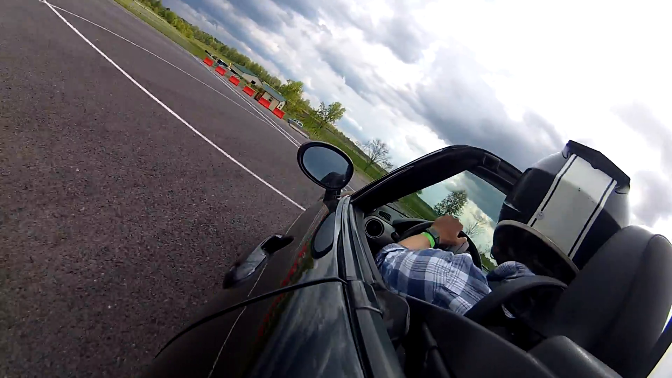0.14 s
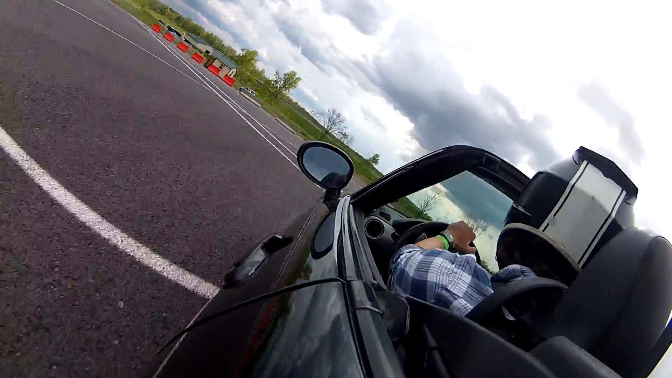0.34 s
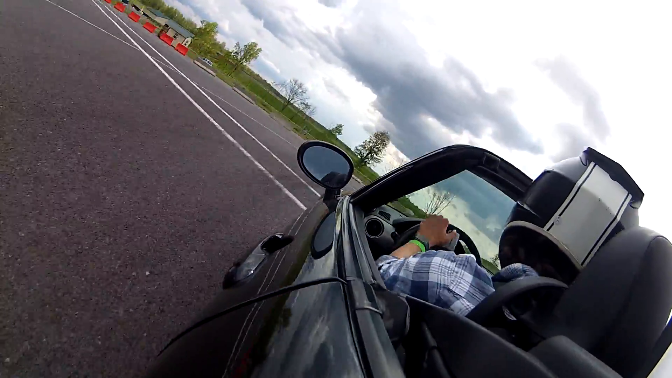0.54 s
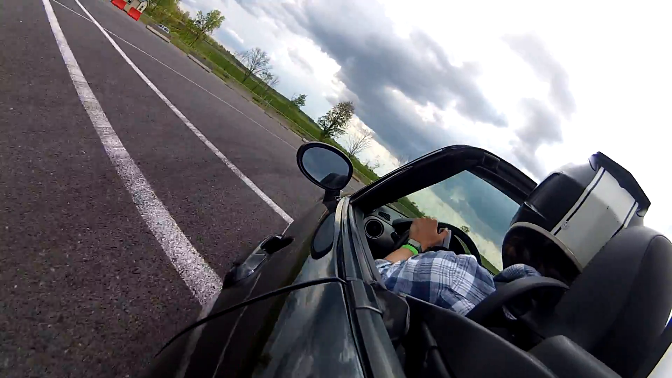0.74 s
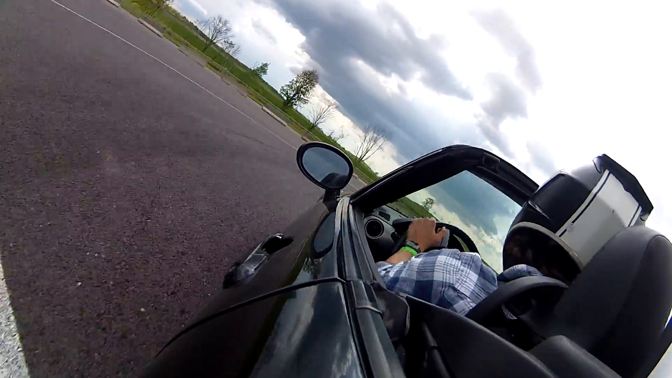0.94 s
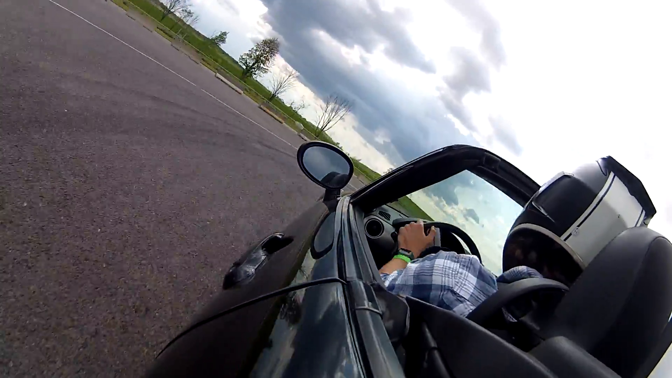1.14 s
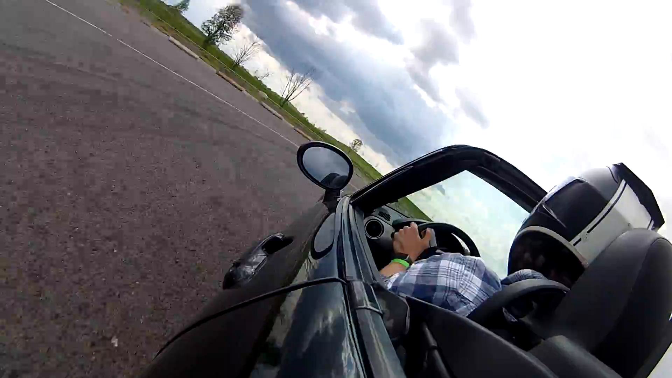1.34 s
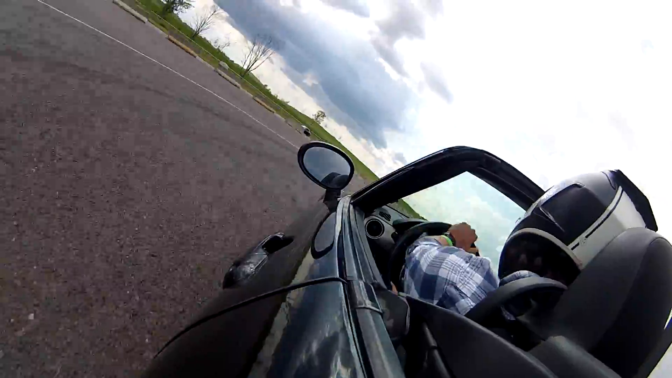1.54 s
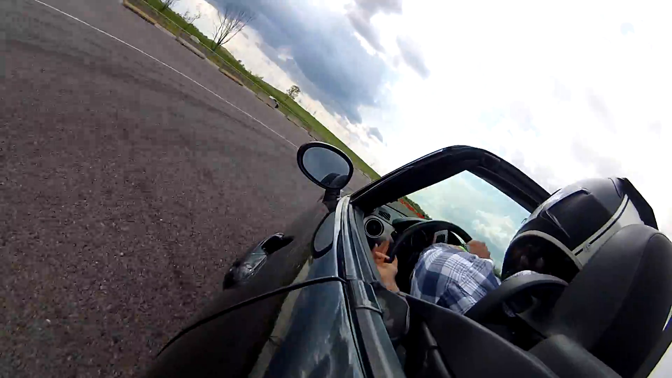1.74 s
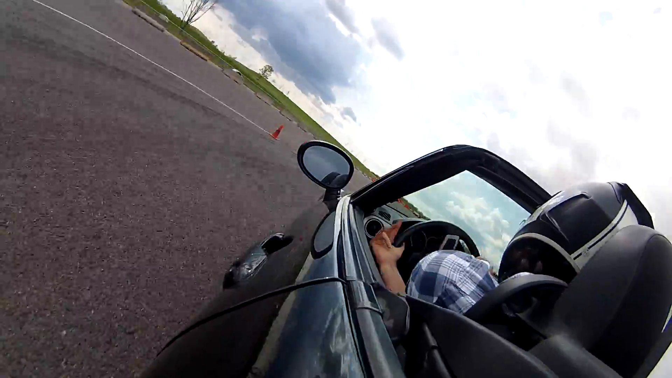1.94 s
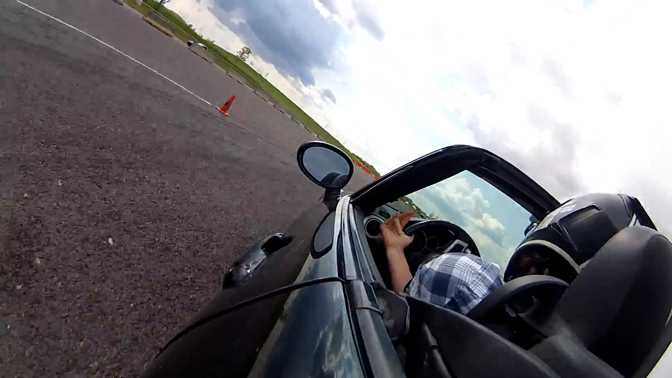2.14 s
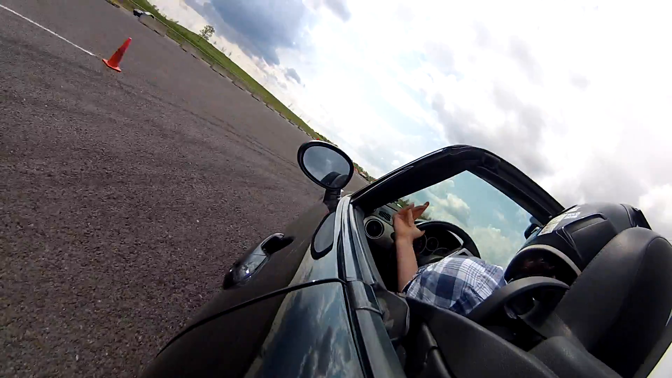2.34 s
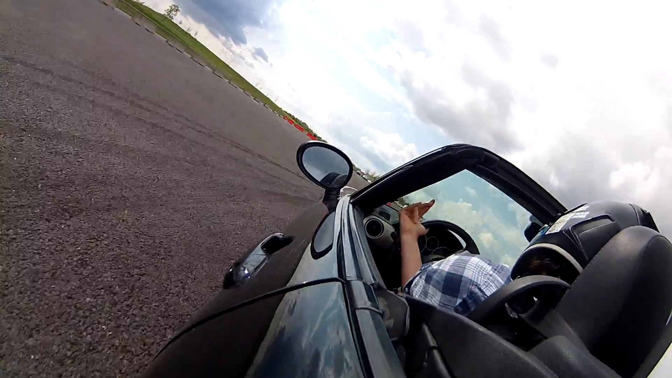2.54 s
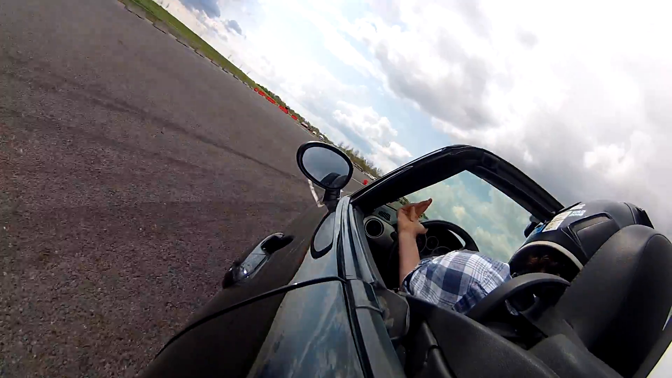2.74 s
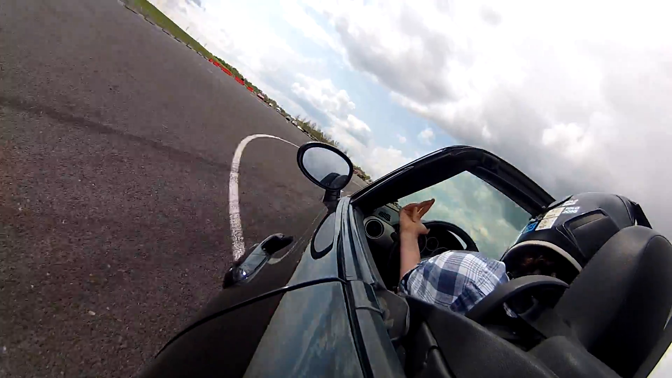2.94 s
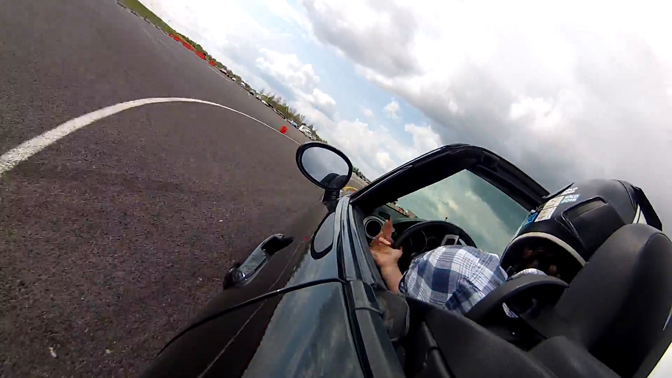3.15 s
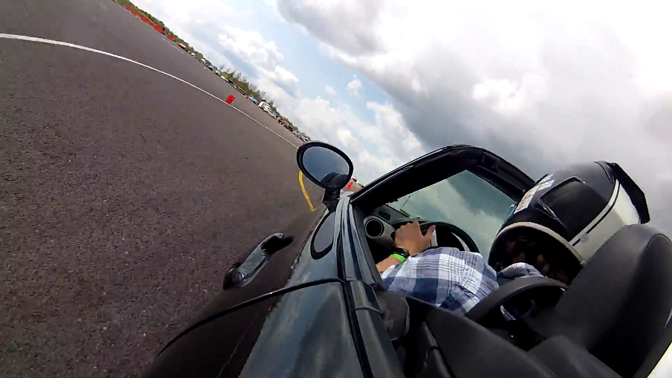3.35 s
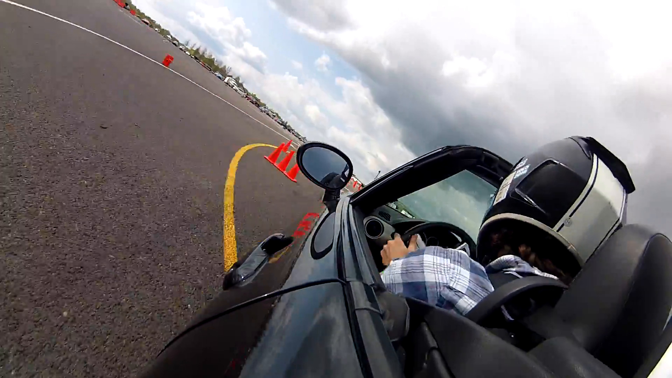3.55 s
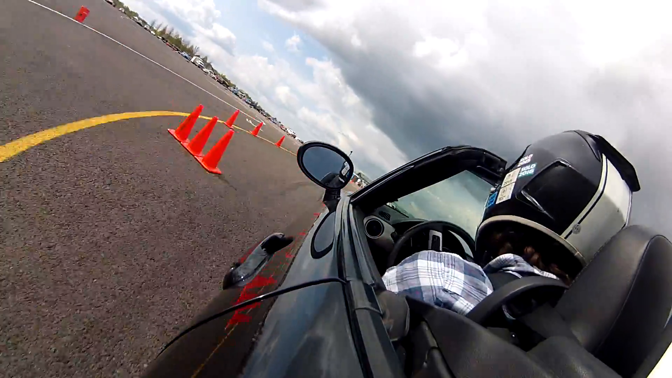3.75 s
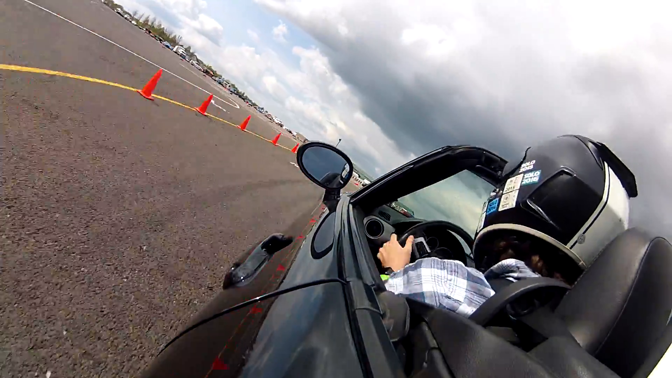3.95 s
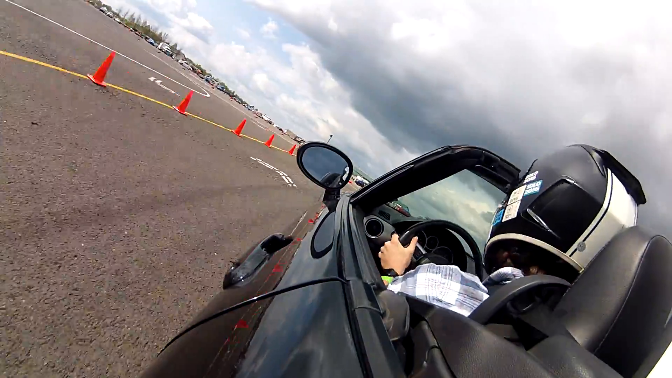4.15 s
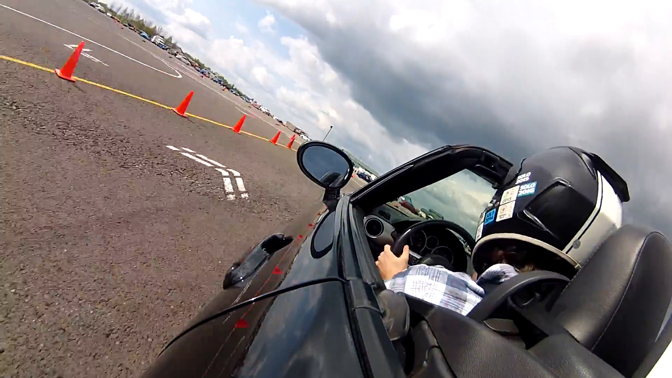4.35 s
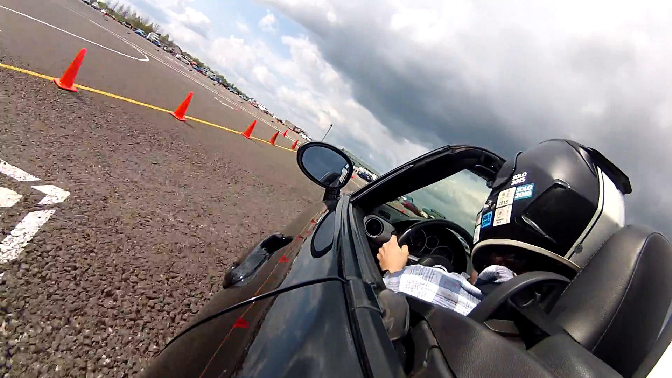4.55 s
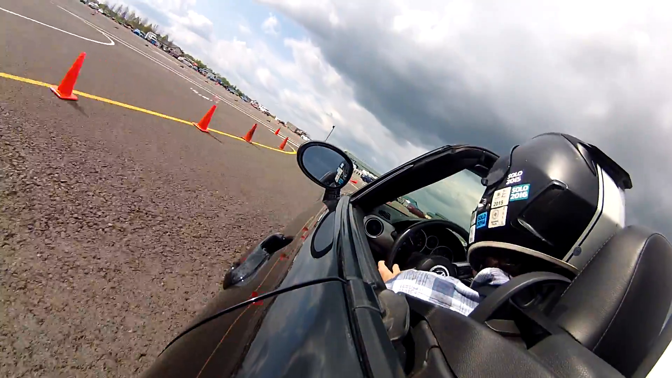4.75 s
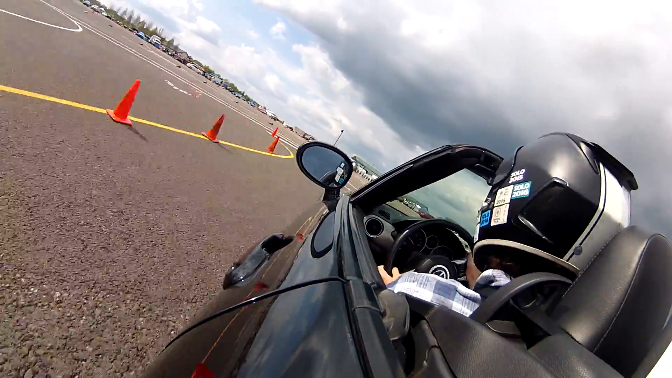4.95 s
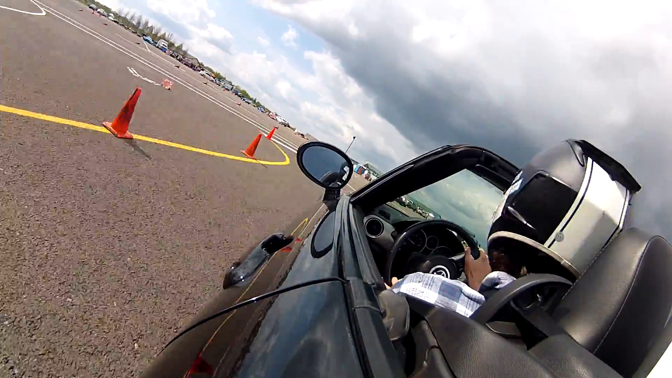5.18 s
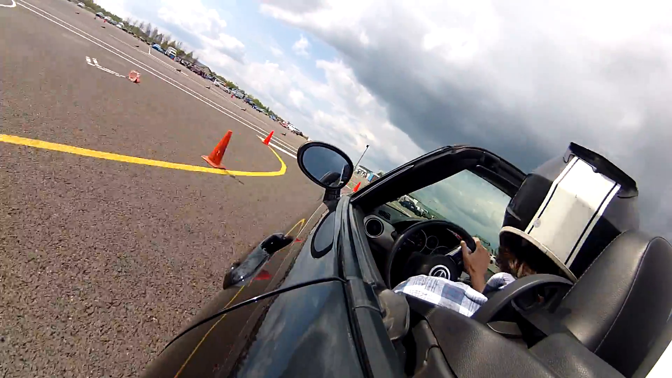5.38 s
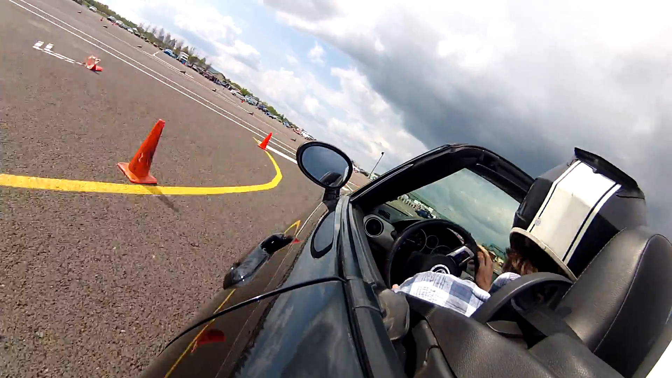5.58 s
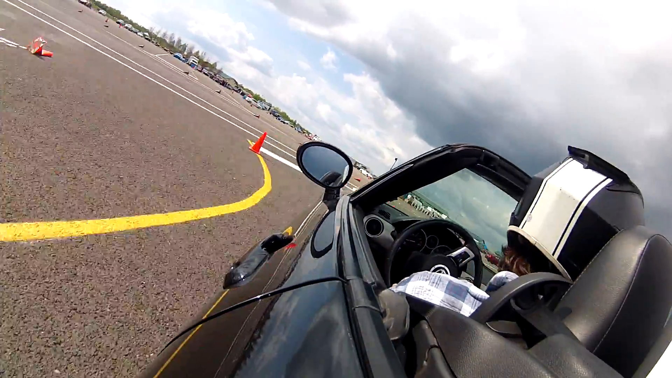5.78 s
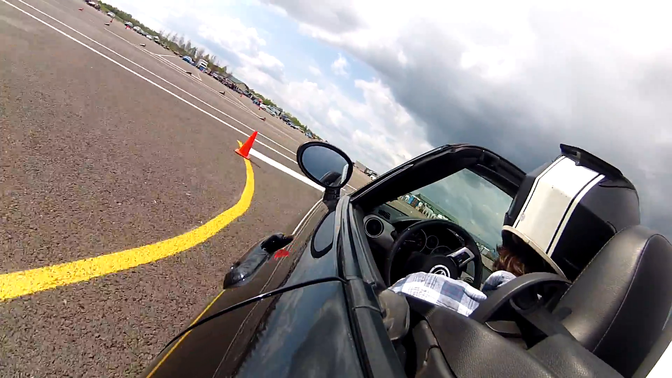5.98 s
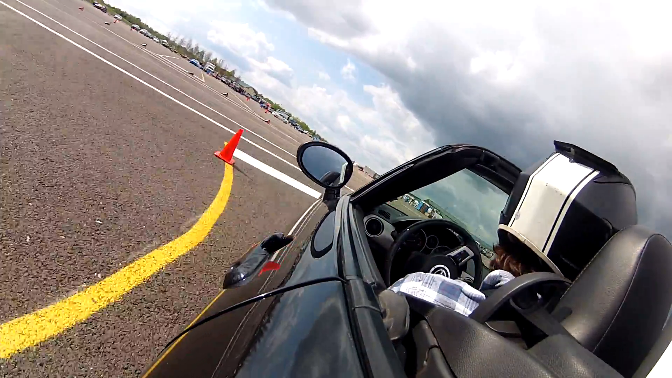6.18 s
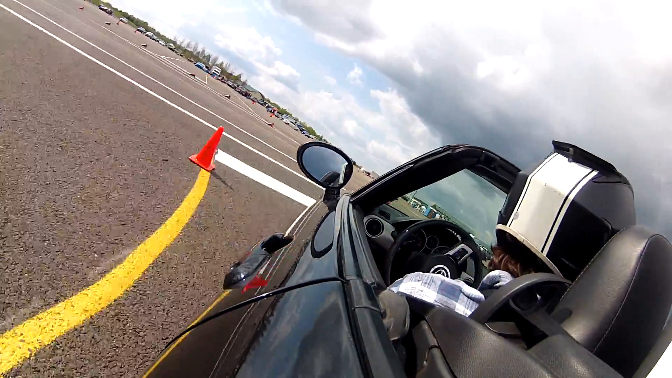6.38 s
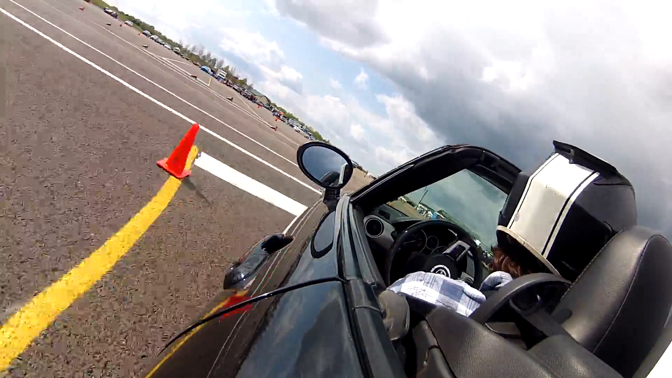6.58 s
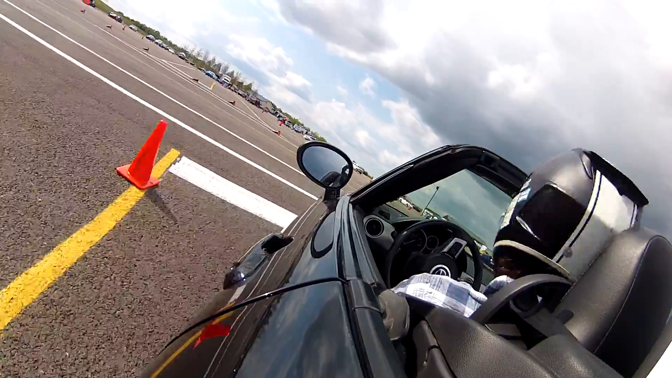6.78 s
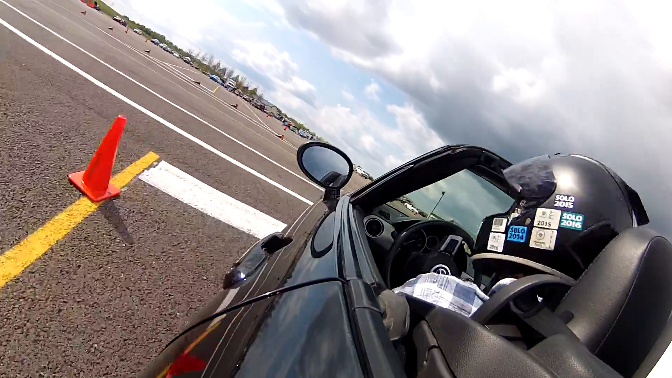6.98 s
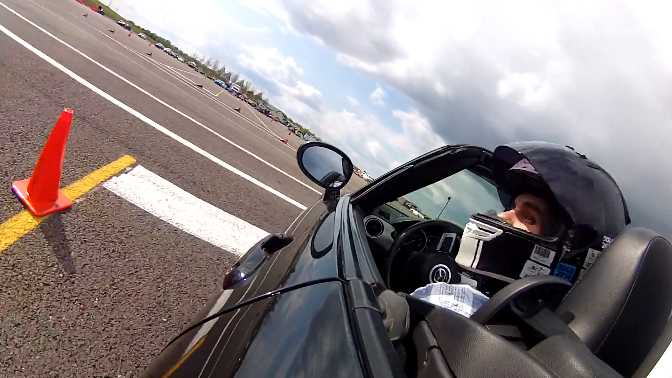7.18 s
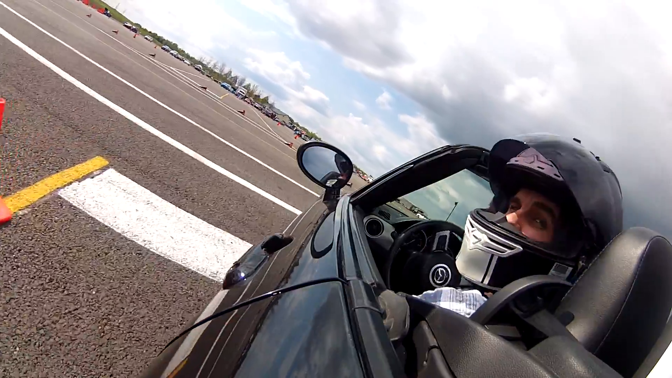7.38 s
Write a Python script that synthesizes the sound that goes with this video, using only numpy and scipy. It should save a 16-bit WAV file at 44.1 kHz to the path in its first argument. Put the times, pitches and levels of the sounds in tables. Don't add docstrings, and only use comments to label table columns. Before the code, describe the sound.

Close on a car's flank, a raspy four-cylinder surges over tyre rush and wind, crackles between stabs, then coasts, shudders and sinks to quiet puffing idle.

```python
import sys
import numpy as np
from scipy import signal
from scipy.fft import rfft, irfft, next_fast_len
from scipy.io import wavfile
from scipy.ndimage import map_coordinates

SR = 44100
rng = np.random.default_rng(int(sys.argv[2]) if len(sys.argv) > 2 else 0)


def unload_audio(sound):
    columns = np.transpose(np.atleast_2d(sound))
    steps = np.round(np.clip(columns, -1, 1) * 32767)
    wavfile.write(sys.argv[1], SR, steps.astype(np.int16))


def field_ratio(decibels):
    return 10 ** (np.asarray(decibels, dtype=float) / 20)


N = 327222
JUDDER_FROM_S, JUDDER_TO_S = 5.52, 6.28


def unit(x):
    return x / np.sqrt(np.mean(x ** 2) + 1e-20)


def along(points, hz):
    f, v = np.transpose(points)
    return np.interp(np.log(hz + 1), np.log(f + 1), v)


def curves(rows):
    s, *cols = np.transpose(rows)
    return [np.interp(np.arange(N) / SR, s, c) for c in cols]


def chance(position):
    return map_coordinates(rng.standard_normal(4000), [position], order=1)


def wobble(rate):
    return chance(np.arange(N) * rate / SR)


def window(start, stop, edge):
    t = np.arange(N) / SR
    return np.clip(np.minimum(t - start, stop - t) / edge + .5, 0, 1)


def bump(at, width):
    return np.exp(-((np.arange(N) / SR - at) / width) ** 2)


def coloured(spectrum, peaks=()):
    m = next_fast_len(N)
    hz = np.fft.rfftfreq(m, 1 / SR)
    resonance_db = sum(db * np.exp(-((hz - c) / w) ** 2) for c, w, db in peaks)
    level_db = along(spectrum, hz) + resonance_db
    return unit(irfft(rfft(rng.standard_normal(m)) * field_ratio(level_db), m)[:N])


def bursts(times, carrier, level_db, t60, rise):
    out, t = np.zeros(N + SR), np.arange(SR // 8) / SR
    for s, db, life in zip(times, level_db, t60):
        envelope = field_ratio(db + 6.0 - 60 * t / life) * (1 - np.exp(-t / rise)) ** 2
        out[round((s - rise) * SR):][:len(t)] += envelope
    return out[:N] * carrier


def ring(rows, noise_hz, rise):
    out, t = np.zeros(N + SR), np.arange(SR // 6) / SR
    for s, db, hz, t60 in rows:
        drift = np.cumsum(rng.standard_normal(len(t))) * np.sqrt(noise_hz / SR)
        envelope = field_ratio(db + 6.0 - 60 * t / t60) * (1 - np.exp(-t / rise)) ** 2
        out[round(s * SR):][:len(t)] += envelope * np.sin(2 * np.pi * hz * t + drift)
    return out[:N]


# (press [s], lift [s], release [s], rasp at press [dB], rasp at lift [dB])
PRESSES = [
    (0.163, 0.302, .85, -37, -35),
    (.37, 1.473, .21, -34, -37.5),
    (2.304, 2.567, 0.2537, -35, -35.5),
    (2.851, 3.01, .22, -34, -37),
    (3.084, 4.12, 0.2004, -35.5, -33),
]


def pedal():
    t = np.arange(N) / SR
    idle_db, in_gear_db = -94, -71
    lag_s, sag_s, sag_db = .04, 0.047, -3.4
    shut_db = idle_db + (in_gear_db - idle_db) * window(-1, JUDDER_TO_S, .2)
    opening, sag, gas_db = np.zeros(N), np.zeros(N), shut_db
    for press, lift, release, first_db, last_db in PRESSES:
        since = np.maximum(t - press, 0)
        closing = np.clip((t - lift) / release, 0, 1)
        wide = (1 - np.exp(-since / lag_s)) * np.cos(np.pi / 2 * closing) ** 2
        rush = since / sag_s * np.exp(1 - (since / sag_s) ** 2) / np.exp(.5)
        full_db = np.interp(t, [press, lift], [first_db, last_db]) + sag_db * rush
        opening, sag = np.maximum(opening, wide), sag + rush
        gas_db = np.maximum(gas_db, shut_db + (full_db - shut_db) * wide)
    return opening, sag, gas_db


# (time [s], firing rate [Hz])
REVS = [(0, 130), (.18, 126.3), (.5, 130.9), (.75, 138.8), (1.2, 155.4), (1.4, 151.6), (1.57, 168.2),
        (1.69, 150.2), (1.84, 138.8), (2.21, 127), (2.5, 128.3), (2.81, 124), (3.04, 132.7), (3.2, 124.5),
        (3.68, 137.6), (3.8, 131), (4.1, 137.9), (4.29, 135.8)]
# (time [s], firing rate [Hz], puff level [dB])
BRAKING = [
    (4.419, 139.4, -28),
    (4.63, 122.8, -26),
    (5.1, 100.8, -31.5),
    (5.62, 75.49, -32.5),
    (5.87, 67.11, -37.5),
    (6.16, 55.11, -40.5),
    (6.49, 45.72, -48),
    (7.13, 32.04, -57.5),
    (7.42, 29.2, -61),
]


def crank():
    spin_hz, firing_at_s = 9, 7.22
    hz = curves(REVS + [row[:2] for row in BRAKING])[0] + spin_hz * pedal()[0] ** 3
    turns = np.cumsum(hz) / SR
    return hz, turns, turns - turns[round(firing_at_s * SR)]


# (time [s], level change [dB], width [s])
MISFIRES = [
    (5.678, -7, .024),
    (5.752, -2.5, 0.026),
    (5.87, -10, 0.018),
    (6.042, -9, 0.0061),
    (6.13, -7, .01),
    (6.255, -2, 0.014),
]


def stumbles():
    return sum(db * bump(s, wide) for s, db, wide in MISFIRES)


# (from [s], to [s], boom level [dB])
COASTS = [
    (-.1, .155, -32.5),
    (1.638, 2.298, -29),
    (2.78, 2.85, -35.5),
    (4.277, 6, -29.5),
]


def levels(hz):
    opening, sag, gas_db = pedal()
    pumped = sum(field_ratio(db) * window(start, stop, 0.043) for start, stop, db in COASTS)
    boom_db = -23 - 24 * (1 - opening) - 0.1146 * (hz - 138) - 3.4 * sag
    boom = field_ratio(boom_db) + pumped
    firing = 1 - 0.65 * sum(window(start - .03, stop, .03) for start, stop, _ in COASTS)
    over_db = -26 - 18 * (1 - opening) + 0.1886 * (hz - 139.5) + 1.1 * wobble(9)
    over = firing * field_ratio(over_db) + field_ratio(-10.5) * pumped
    judder = window(JUDDER_FROM_S, JUDDER_TO_S, .03)
    loss_db = stumbles() + 1.3 * judder * wobble(45)
    gas_db = gas_db + 0.1961 * opening * (hz - 140) + 0.43 * wobble(8) + loss_db
    puff_db = curves(BRAKING)[1]
    judder_buzz_db = -56.5 + 0.5 * (puff_db + 36.5) + 1.0 * loss_db
    buzz_db = judder * judder_buzz_db + (1 - judder) * (puff_db - 27)
    return 20 * np.log10(boom), 20 * np.log10(over), gas_db, puff_db + loss_db, buzz_db


# (frequency [Hz], level [dB])
PIPE_OPEN = [(50, -8), (150, -3), (330, -5.5), (650, -5.5), (800, -10), (950, -21), (1500, -34),
             (3000, -120)]
# (multiple of firing rate [1], level [dB])
OVERRUN = [(0.5, -28), (1, 0), (1.5, -24.5), (2, -22.5), (2.5, -19.5), (3, -20), (3.5, -27.5), (4, -28.5),
           (4.5, -31), (5, -22.5), (5.5, -26), (6, -35)]
# (frequency [Hz], level [dB])
PIPE_SLOW = [(15, -13.5), (30, 5), (47, 2.5), (94, 2), (156, -4), (190, -5), (245, -18.5), (320, -12),
             (400, -21.5), (520, -39), (900, -74.5)]


def firing_orders(hz, phase, load, slow):
    stack, puffs, stack_power, puff_power = np.zeros(N), np.zeros(N), 1e-12, 1e-12
    for order in np.arange(1, 19) / 2:
        half = order % 1 > 0
        drift = (.1 + .22 * load + .005 * order ** 2 * slow) * wobble(17)
        sway = field_ratio(.9 * wobble(14))
        tone = -sway * np.cos(order * phase - 0.24 * order + 1.3 * half * order ** 2 + drift)
        open_db = along(PIPE_OPEN, order * hz) - 11 * half
        shut_db = along(OVERRUN + [(5.9, -74)], order) + 18 - 7.1 * (order < 1)
        gain = field_ratio(load * open_db + (1 - load) * shut_db) * (order != 1)
        stack += gain * tone
        stack_power = stack_power + gain ** 2 / 2 * (order > 1)
        gain = field_ratio(along(PIPE_SLOW, order * hz) - 16 * half - 10 * (order < 1))
        puffs += gain * tone
        puff_power = puff_power + gain ** 2 / 2
    return stack / np.sqrt(stack_power), puffs / np.sqrt(puff_power)


# (frequency [Hz], level [dB per Hz])
GAS = [(35, -50.5), (60, -23.5), (102, -15), (126, -19.5), (145, -12.5), (192, -11.5), (313, -15.5),
       (360, -16), (629, -11.5), (1000, -15), (1970, -12), (3210, -20), (4770, -31), (10300, -34.5),
       (15600, -47.5)]
# (frequency [Hz], width [Hz], level [dB])
HOUSING = [(720, 50, 3.5), (1920, 67, 4), (3135, 71, 4), (4800, 100, -8), (5470, 130, 1.5),
           (6220, 390, -4.5), (7980, 1200, 4), (9300, 110, -7), (10400, 910, 4)]


def gas_rasp(turns, phase, gas_db):
    lull, sharpness, lag = .62, 1.6, -0.029
    blow = 1 - lull * np.exp(sharpness * (np.cos(phase - 2 * np.pi * lag) - 1))
    gas = coloured(GAS, HOUSING)
    dull = signal.sosfilt(signal.butter(2, 5000, fs=SR, output="sos"), gas)
    hiss_db = 3.6 * (np.clip((gas_db + 64.5) / 30, 0, 1) - 1)
    gas = dull + field_ratio(hiss_db) * (gas - dull)
    gust_db = 1.2 * chance(turns) + 1.1 * np.cos(phase / 2)
    return field_ratio(gas_db + 11) * unit(blow * field_ratio(gust_db)) * gas


# (frequency [Hz], level [dB per Hz])
PANELS = [(250, -30), (550, 16), (850, -26), (1250, 6.5), (1600, -15), (1900, 1), (2600, 1), (3300, -14),
          (4300, -14), (8000, -26), (11000, -20), (14000, -70)]


def panel_buzz(hz, turns, phase, buzz_db):
    shake = unit(np.exp(1.3 * np.cos(phase + 1.63)) * field_ratio(2 * chance(turns)))
    return np.clip((95 - hz) / 18, 0, 1) * field_ratio(buzz_db + 1.0) * shake * coloured(PANELS)


def engine():
    hz, turns, firings = crank()
    boom_db, over_db, gas_db, puff_db, buzz_db = levels(hz)
    load = np.clip((gas_db + 67.0) / 18, 0, 1)
    slow = np.clip((112 - hz) / 25, 0, 1)
    strength = chance(turns)
    phase = 2 * np.pi * firings
    rough_db = 1.15 + (1.9 - 1.15) * load
    stack, puffs = firing_orders(hz, phase, load, slow)
    stack *= field_ratio(over_db - 2 + rough_db * strength)
    boom = -np.sqrt(2) * field_ratio(boom_db + 0.24 * rough_db * strength) * np.cos(phase - .2)
    scatter_db = .4 + .6 * np.clip((80 - hz) / 20, 0, 1)
    puffs *= field_ratio(puff_db - .6 + scatter_db * strength)
    tones = (1 - slow) * (boom + stack) + slow * puffs
    return tones + gas_rasp(turns, phase, gas_db) + panel_buzz(hz, turns, phase, buzz_db)


# (time [s], level [dB])
ROAD = [(0, -44.5), (.3, -50), (1.4, -35), (1.9, -46.5), (2.25, -48.5), (3.2, -42.5), (4.2, -40),
        (4.4, -48), (5.4, -47.5), (5.68, -53.5), (5.9, -52), (6.25, -59), (6.8, -67), (7.42, -68.5)]
# (frequency [Hz], level [dB per Hz])
TYRES = [(150, -30.5), (300, 0.5), (450, -8), (680, -6.5), (1010, -14), (1350, -13), (1700, -18.5),
         (2650, -20.5), (5090, -41), (8190, -42), (12100, -51.5), (13500, -66), (15000, -97.5)]
# (frequency [Hz], level [dB per Hz])
TREAD = [(1100, -50.5), (1450, -16), (1600, -9.5), (1750, -0.5), (2200, -50.5)]


def tyres():
    rush_db, = curves(ROAD)
    hum_db = rush_db - 21 + 10 * bump(1.9, .3)
    rush = field_ratio(rush_db + .7 * stumbles() + 0.39 * wobble(6.9) + 0.87 * wobble(59)) * coloured(TYRES)
    return rush + field_ratio(hum_db + 3 * wobble(27)) * coloured(TREAD)


# (frequency [Hz], level [dB per Hz])
BUFFET = [(15, -28), (30, -20.5), (60, 6.5), (120, 8), (300, -1.5), (600, -52.5)]
# (time [s], level [dB])
JOLTS = [
    (0, -49.5),
    (.19, -46),
    (2.3, -51.5),
    (2.8, -46.5),
]


def wind():
    speed_db = 6 * np.log2(crank()[0] / 140)
    gusts = field_ratio(-64 + speed_db + 6.5 * pedal()[0] + 6 * np.tanh(wobble(8.2)))
    jolts = sum(field_ratio(db) * bump(s, .055) for s, db in JOLTS)
    return field_ratio(11) * (gusts + jolts) * coloured(BUFFET)


# (frequency [Hz], level [dB per Hz])
HISS = [(2500, -30), (4000, -2), (6000, -6), (8000, -1), (10000, -5), (12700, -7), (13100, -60)]


def microphone_hiss():
    return field_ratio(-90) * coloured(HISS)


# (time [s], crack level [dB], thud level [dB], t60 [s])
POPS = [(0.019, -32, -26.5, 0.024), (0.135, -29, -32, 0.025), (0.1769, -26, -25, 0.041),
        (1.618, -40, -34, 0.024), (1.662, -46, -48, .02), (2.189, -41, -40.5, 0.03),
        (2.2977, -19.5, -20, 0.027), (2.3184, -31, -39.5, 0.021), (2.3306, -30.5, -35, 0.042),
        (2.7862, -35, -34.5, 0.023), (2.8131, -25.5, -33, 0.021), (2.8392, -34, -35.5, 0.03),
        (2.8952, -27, -32, 0.018), (4.2704, -56, -30.5, 0.026)]


def pops():
    s, crack_db, thud_db, t60 = np.transpose(POPS)
    out, u = np.zeros(N + SR), np.arange(SR // 20) / SR / 0.001
    for at, db in zip(s, thud_db):
        out[round(at * SR):][:len(u)] += field_ratio(db + 14) * u * (2 - u) * np.exp(-u)
    return out[:N] + bursts(s, coloured(GAS), crack_db, t60, rise=0.0035)


# (time [s], peak level [dB], frequency [Hz], t60 [s])
KNOCKS = [
    (1.249, -26, 810.2, 0.038),
    (1.281, -20.5, 956, 0.072),
    (1.299, -9.5, 913, 0.019),
    (1.332, -19, 898, 0.028),
]
STONES = [
    (1.786, -33, 760, 0.033),
    (2.006, -24.5, 800, 0.022),
    (2.122, -34.5, 710, 0.018),
]
THUMPS = [
    (5.641, -34, 230, 0.063),
    (5.765, -35.5, 288, 0.04),
    (5.799, -55, 341, 0.036),
    (5.853, -31.5, 317, 0.04),
    (5.869, -40.5, 295, 0.045),
    (6.012, -36.5, 236, 0.043),
    (6.041, -32.5, 341, 0.035),
    (6.078, -41, 343, 0.044),
    (6.212, -41.5, 282.5, 0.053),
    (6.855, -47.5, 320, 0.04),
]


def knocks():
    return ring(KNOCKS + STONES + THUMPS, noise_hz=30, rise=0.0012)


# (time [s], peak level [dB], frequency [Hz], t60 [s])
LURCHES = [
    (1.625, -33.5, 95, .07),
    (1.7, -42, 1380, .15),
    (4.25, -34.5, 85, .08),
    (6.03, -39, 590, .1),
    (5.85, -46.5, 560, 0.084),
]


def lurches():
    return ring(LURCHES, noise_hz=40, rise=0.0081)


# (time [s], peak level [dB], frequency [Hz], scratch level [dB])
RATTLES = [(5.564, -39.5, 1475, -23), (5.628, -36, 1257, -22), (5.652, -38.5, 1024, -16),
           (5.701, -41, 1060, -7), (5.723, -39, 1270, -19), (5.785, -37, 1160, -11),
           (5.807, -40, 1180, -24), (5.837, -39.5, 2560, -26), (5.852, -41, 1796, -16),
           (5.888, -41.5, 1320, -25), (5.911, -38, 1180, -26), (5.957, -38.5, 1290, -18),
           (5.988, -41.5, 1270, -16), (6.02, -35, 1770, -8), (6.03, -36, 1130, -17),
           (6.051, -36.5, 1200, -25), (6.079, -35.5, 1170, -11), (6.101, -41.5, 1203, -18),
           (6.114, -36.5, 1138, -7), (6.14, -39.5, 1110, -24), (6.175, -46.5, 1300, -23),
           (6.213, -46.5, 1030, -18), (6.242, -40.5, 1150, -15), (6.269, -41.5, 1710, -24)]


def rattles():
    ticks = np.flatnonzero(np.diff(np.floor(crank()[2] + .18))) / SR
    ticks = ticks[ticks > 7.13]
    luck = rng.standard_normal((60, 3))
    idle = [(s, -58 + 2.6 * a, 1530 * 1.4 ** b, -22 + 3 * c) for s, (a, b, c) in zip(ticks, luck)]
    s, db, hz, bright_db = np.transpose(RATTLES + idle)
    life = np.full(len(s), 0.026)
    panel = ring(zip(s, db - 5.0, hz, life), noise_hz=1443, rise=0.00064)
    panel = signal.sosfilt(signal.butter(2, 5500, fs=SR, output="sos"), panel)
    dull = coloured([(150, -34), (400, 6.0), (1300, 1), (2600, 2), (4000, -14), (6000, -46.5)])
    bright = coloured([(2500, -30), (4200, 12), (6000, -16), (8000, 2), (11000, -8), (14000, -17), (15400, -32.5)])
    body = bursts(s, dull, db - 5.5, life, rise=0.002)
    scratch = bursts(s, bright, db + bright_db - 3, life, rise=.003)
    return panel + body + scratch


# (time [s], frequency [Hz], level [dB])
WHINES = [
    [(6.3, 650, -90), (6.4, 600, -72), (6.65, 525, -70), (6.9, 450, -73), (7, 420, -90)],
    [(6.4, 780, -90), (6.5, 730, -78), (6.7, 660, -77), (6.85, 610, -79), (6.95, 580, -90)],
    [(6.75, 690, -90), (6.85, 640, -75), (7.1, 535, -73), (7.25, 462, -75), (7.3, 480, -77),
     (7.42, 555, -72)],
]


def gears():
    out = np.zeros(N)
    for hz, db in map(curves, WHINES):
        phase = 2 * np.pi * np.cumsum(hz + 2.5 * wobble(40)) / SR
        out += field_ratio(db + 3 + 2.5 * wobble(12)) * np.sin(phase)
    return out


def scene():
    running = engine() + tyres() + wind() + microphone_hiss()
    events = pops() + knocks() + lurches() + rattles() + gears()
    return (running + events)[None]


def low_pass(x):
    return signal.sosfilt(signal.butter(12, 15770, fs=SR, output="sos"), x)


def record(dry):
    bass_hz, top_hz = 24, 15470
    m = next_fast_len(N + SR // 4)
    hz = np.fft.rfftfreq(m, 1 / SR)
    response = (hz < top_hz) * hz ** 2 / (hz ** 2 + bass_hz ** 2)
    band = irfft(rfft(dry, m) * response, m)[:, :N]
    return low_pass(band)


dry = scene()
out = record(dry)
unload_audio(out)
```